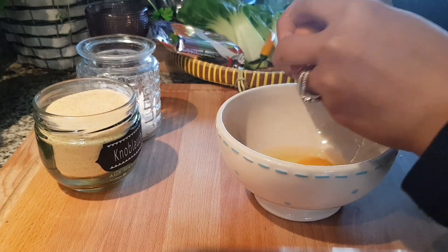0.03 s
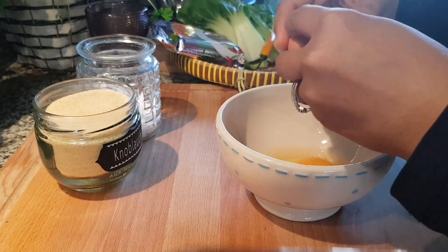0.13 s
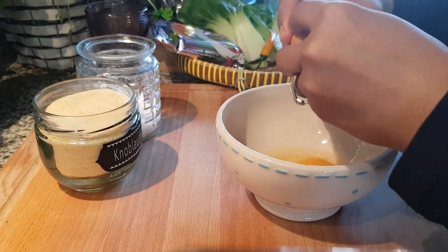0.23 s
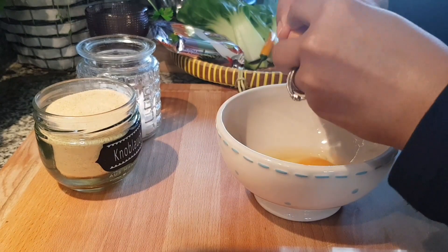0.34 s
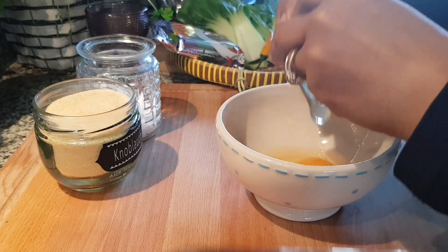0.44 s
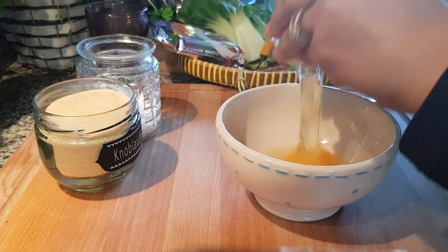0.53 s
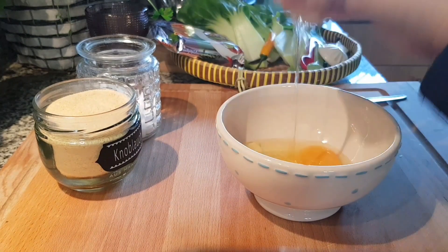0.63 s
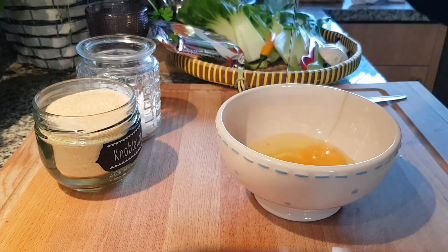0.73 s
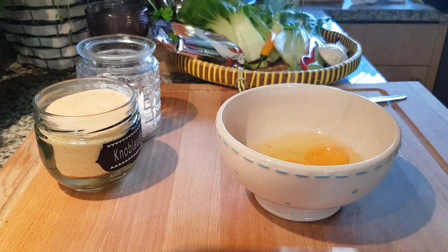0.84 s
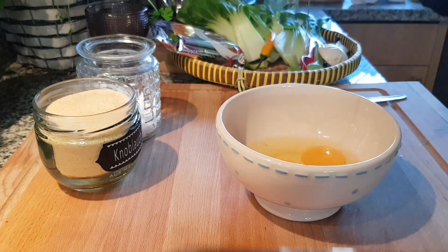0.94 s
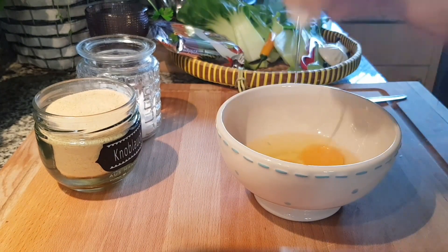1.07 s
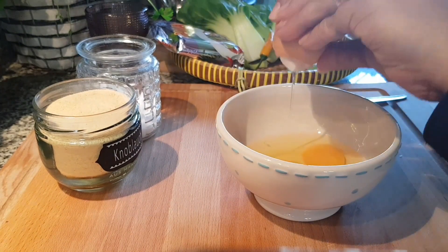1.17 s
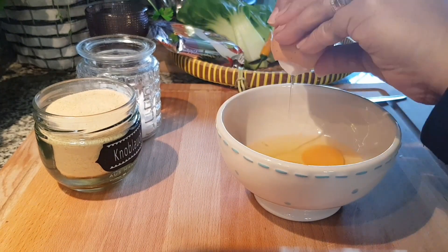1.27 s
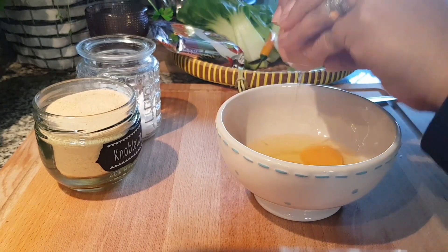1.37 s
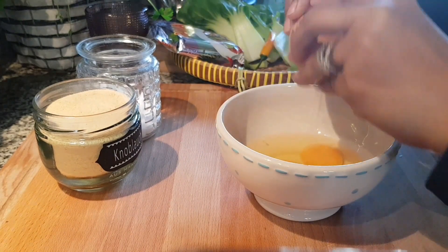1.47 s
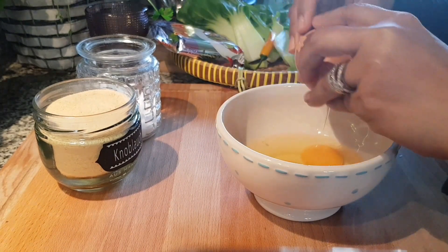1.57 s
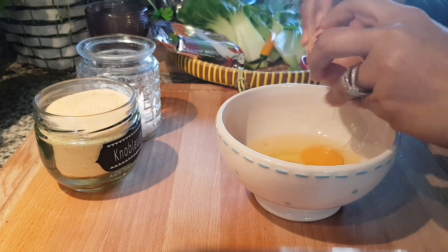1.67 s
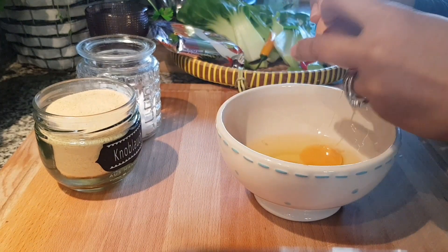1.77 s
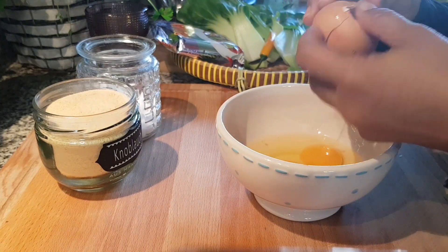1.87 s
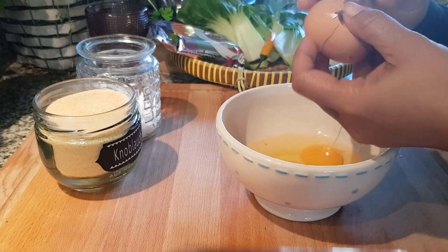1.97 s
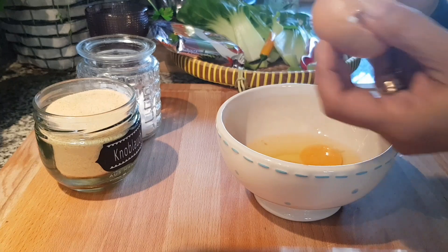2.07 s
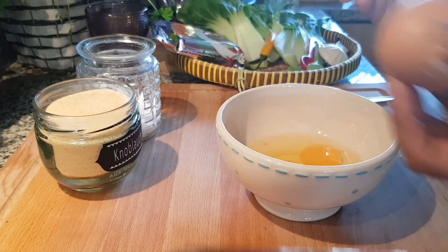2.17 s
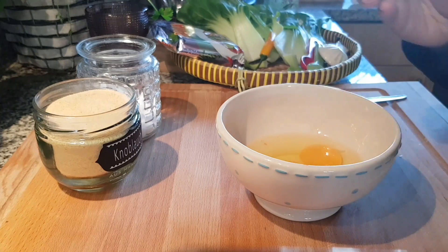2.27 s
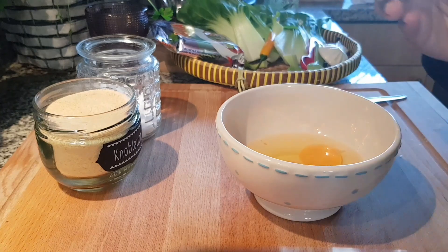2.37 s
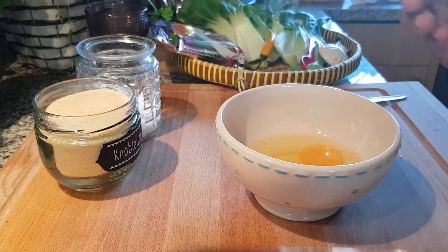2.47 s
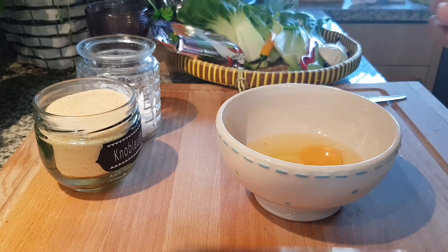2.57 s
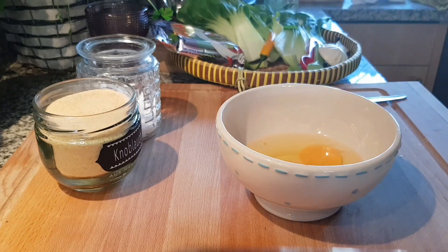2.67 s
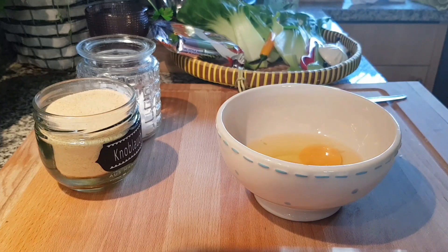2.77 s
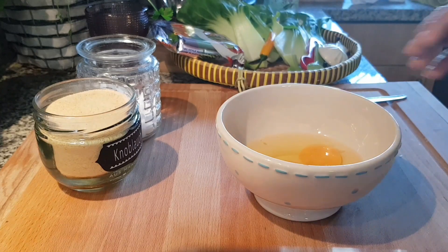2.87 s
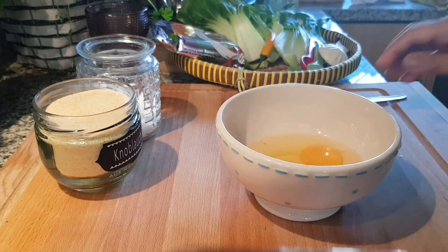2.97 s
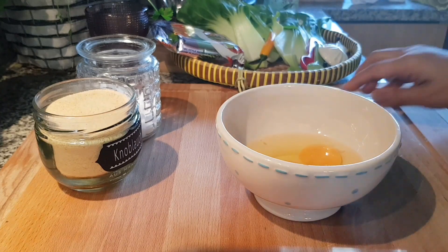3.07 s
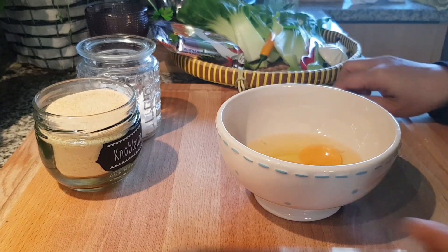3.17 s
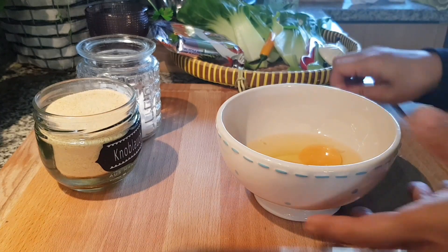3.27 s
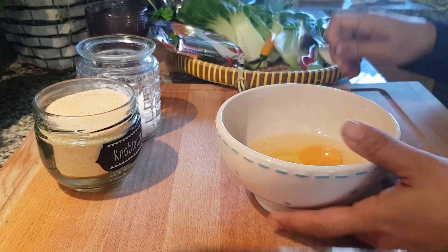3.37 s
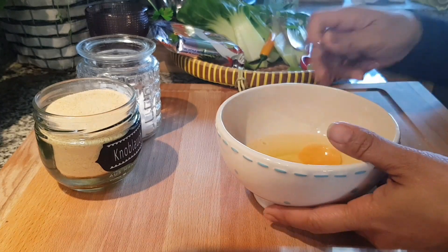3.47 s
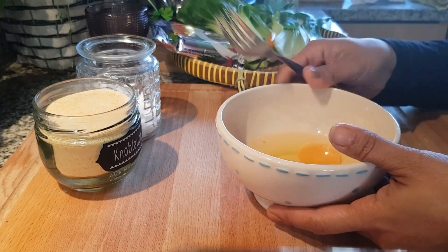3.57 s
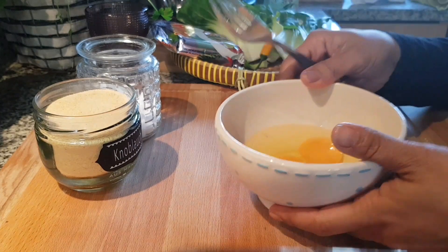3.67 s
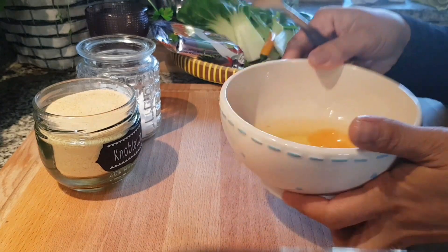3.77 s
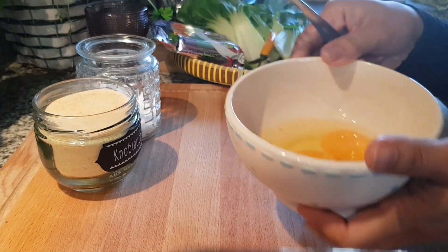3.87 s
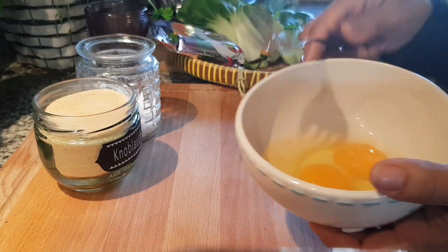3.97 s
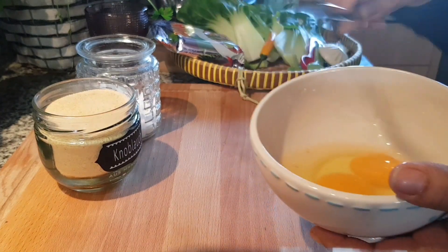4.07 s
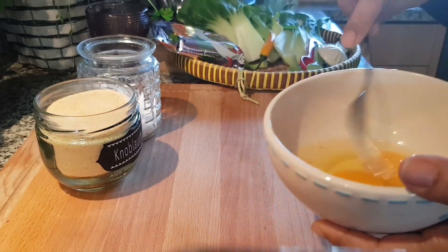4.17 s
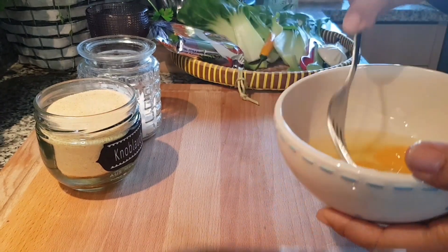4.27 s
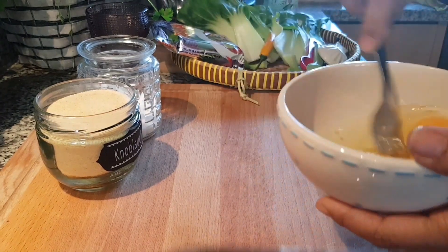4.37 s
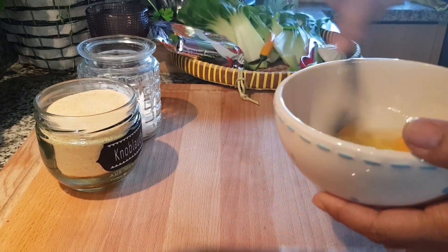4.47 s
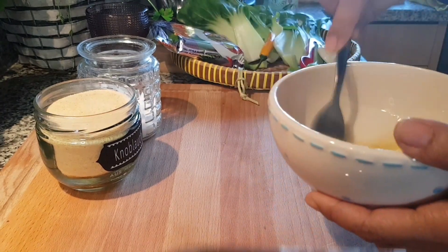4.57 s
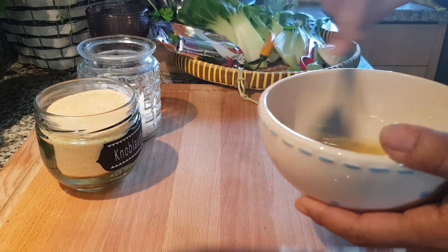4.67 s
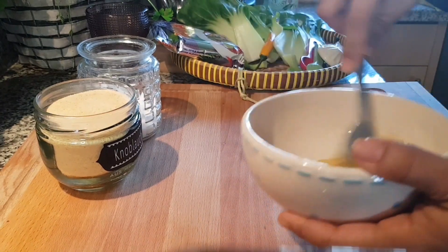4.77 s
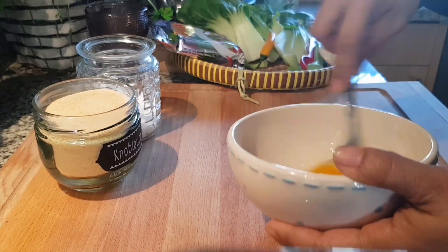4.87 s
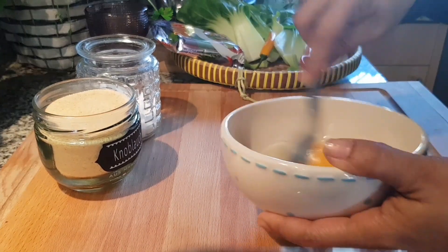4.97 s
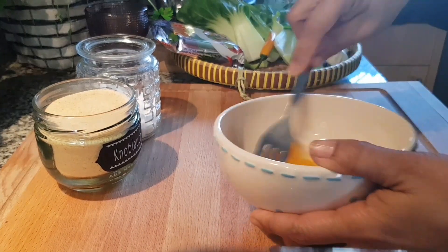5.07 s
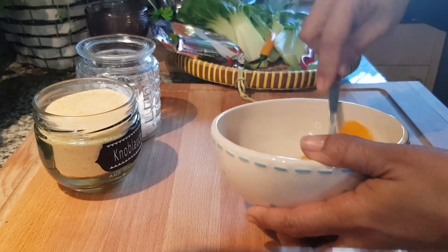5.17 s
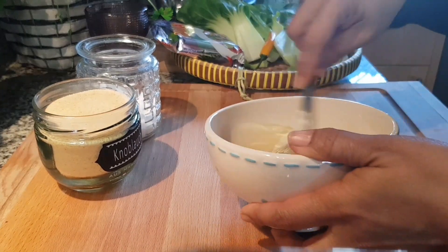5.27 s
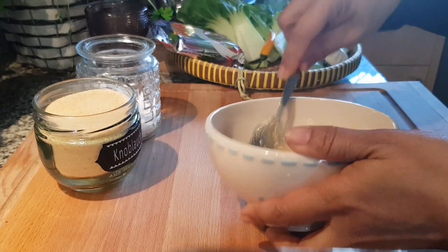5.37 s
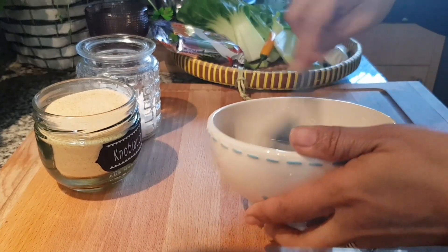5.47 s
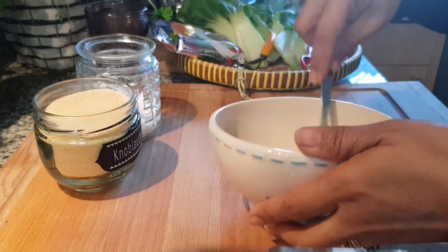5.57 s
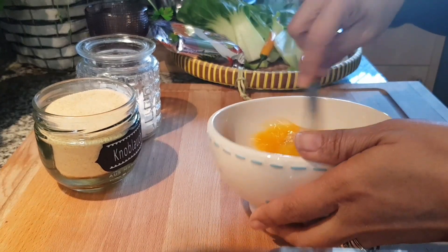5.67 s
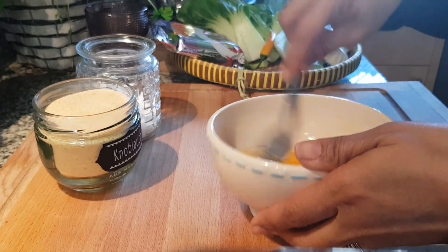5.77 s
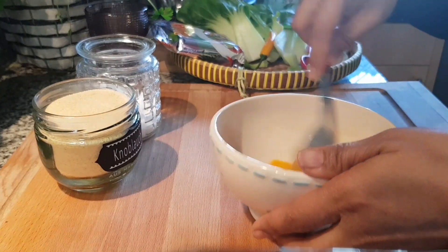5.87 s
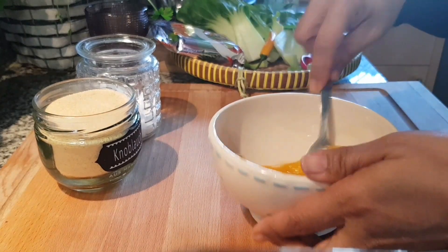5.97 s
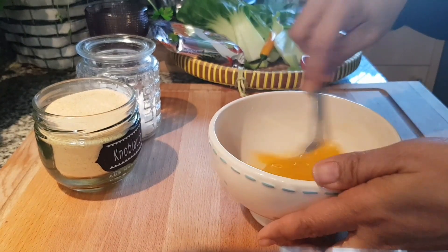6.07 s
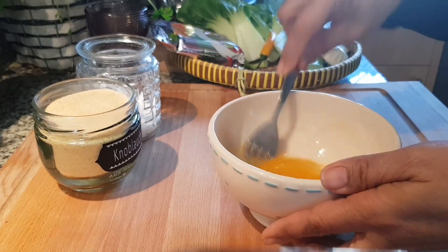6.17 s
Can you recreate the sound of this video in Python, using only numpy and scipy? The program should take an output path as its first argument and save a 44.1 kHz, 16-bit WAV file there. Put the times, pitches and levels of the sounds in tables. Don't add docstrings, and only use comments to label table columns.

```python
import sys
import numpy as np
from scipy import signal
from scipy.fft import rfft, irfft
from scipy.io import wavfile
from scipy.ndimage import uniform_filter1d

SR = 44100
rng = np.random.default_rng(int(sys.argv[2]) if len(sys.argv) > 2 else 0)


def undo_db(level):
    steps = np.asarray(level, float) / 20
    return 10 ** steps


def persist_wave(psi):
    counts = np.round(np.clip(psi, -1, 1) * 32767).astype(np.int16)
    wavfile.write(sys.argv[1], SR, np.atleast_2d(counts).T)


N = 273861
SPAN = 4096
SIDES = np.array([[1], [-1]])

# (frequency [Hz], level [dB], ring time [s])
BOWL = [(600, 32.5, 0.03), (790, 22, 0.09), (893, 27.5, 0.071), (1100, 2, .03), (1146, 3, 0.15),
        (1730, 8, 0.03), (2050, 20.5, 0.013), (2227, 16, 0.1), (2340, 15.5, 0.022), (2910, -47, .06),
        (3350, -71, 0.064), (4120, -18, 0.018), (4910, -13, 0.06), (5770, -41, 0.0083), (6000, -16, 0.032),
        (6555, 5, 0.016), (7220, -1, 0.02), (7920, -5.5, 0.014), (8400, -10, 0.028), (9870, -7, 0.0033),
        (11550, -2.5, 0.012), (13550, -6, 0.044)]
# (time [s], tines level [dB], wall level [dB], chatter [s])
HELD_BEATS = [(4.3723, -43, -75, 0.01), (4.3863, -19, -46, 0.012), (4.4640, -29, -56, 0.012),
              (4.498, -24.5, -46, 0.024), (4.5306, -30, -49, .012), (4.5406, -29, -53.5, 0.014),
              (4.6268, -39, -54, 0.0099), (4.6405, -18.5, -37.5, 0.0084), (4.710, -42, -42, 0.01),
              (4.7571, -28.5, -47, 0.0026), (4.7765, -18, -64, 0.013), (4.8700, -20, -38, 0.008),
              (4.8942, -8, -29, 0.01)]
# (time [s], tines level [dB], wall level [dB], belly level [dB], chatter [s])
LOW_BEATS = [(5.021, -27.5, -42, -46, 0.032), (5.1437, -24, -45, -53, 0.011), (5.183, -18, -32, -57, .0056),
             (5.281, -27.5, -43.5, -47, 0.017), (5.313, -26, -48, -38, 0.014),
             (5.3833, -28.5, -47, -71, .0086), (5.398, -25, -42, -64, 0.022),
             (5.4042, -23.5, -31, -43.5, 0.019), (5.459, -28.5, -44.5, -53, 0.013),
             (5.5312, -31, -38.5, -79, 0.012), (5.5556, -24, -36, -55, 0.016),
             (5.5787, -20.5, -36.5, -46.5, 0.025), (5.6675, -33.5, -46, -70, 0.011),
             (5.682, -30, -45, -53, 0.01), (5.7239, -30.5, -45, -39.5, 0.015),
             (5.7973, -28.5, -47, -78, .014), (5.8175, -28.5, -38.5, -53, 0.011),
             (5.843, -11, -32, -32.5, 0.011), (5.9314, -10.5, -21.5, -27.5, 0.014),
             (5.9823, -12, -28.5, -33, 0.011), (6.089, -21.5, -29.5, -55, .021),
             (6.125, -45, -42, -45, 0.0048)]
# (time [s], tines level [dB], wall level [dB], belly level [dB], chatter [s])
KNOCKS = [
    (5.0436, -22, -38, -36, 0.03),
    (5.0524, -46, -70, -20, 0.0082),
    (5.1590, -53, -70, -20, 0.011),
    (5.2384, -43, -46, -32.5, 0.018),
    (6.0527, -45, -66, -24.5, 0.013),
    (6.0655, -24, -35, -27, 0.02),
    (6.0746, -22.5, -28, -31, 0.016),
    (6.1053, -40, -35.5, -26, .011),
]
EDGE_PIVOT_DB = -30


def unit(x):
    return x / np.sqrt(np.mean(x ** 2, axis=-1, keepdims=True))


def design(lo_hz, hi_hz):
    return signal.butter(2, [lo_hz, min(hi_hz, .45 * SR)], "band", fs=SR, output="sos")


def band(x, lo_hz, hi_hz):
    return signal.sosfilt(design(lo_hz, hi_hz), x)


def fade(t, ring_s):
    return np.exp(-np.log(1000) * t / ring_s)


def walk(rate_hz):
    k = int(SR / rate_hz)
    steps = np.repeat(rng.standard_normal(N // k + 1), k)
    return 1.09 * uniform_filter1d(uniform_filter1d(steps, k), k)[:N]


def add(out, s, sound):
    i = int(s * SR)
    out[:, i:i + sound.shape[1]] += sound[:, :N - i]


def hush():
    # (frequency [Hz], level [dB per Hz])
    colour = [(15, -35), (25, -10), (50, 2), (70, -5.5), (102, 1), (190, -16), (217, -18.5), (384, -21),
              (775, -26), (911, -33), (1160, -60), (3160, -78.5), (4370, -65.5), (8360, -44.5),
              (16000, -32)]
    # (frequency [Hz], level [dB])
    fridge = [
        (47, -59.5),
        (100, -70),
    ]
    f = np.fft.rfftfreq(N, 1 / SR) + 1
    hz, db = np.transpose(colour)
    mid, side = rfft(rng.standard_normal((2, N))) * undo_db(np.interp(np.log(f), np.log(hz), db))
    side = side * np.clip(f / 1100, .2, .95)
    noise = irfft(mid + side * SIDES, N)
    noise = noise / np.std(noise) * undo_db(-56 + .6 * SIDES)
    hum = 0
    for tone_hz, tone_db in fridge:
        level = undo_db(tone_db + 1.0 * walk(11.0))
        turns = np.cumsum(tone_hz * (1 + 0.0223 * walk(5.6))) / SR
        hum = hum + level * np.sin(2 * np.pi * turns)
    return noise + hum


def kitchen(x):
    room_t60_s, room_db, room_gap_s = 0.19, -11, 0.0038
    t = np.arange(2 * SPAN) / SR
    tail = band(rng.standard_normal((2, len(t))), 233, 12000)
    tail = tail * (t > room_gap_s) * fade(t, room_t60_s)
    tail = tail / np.sqrt(np.sum(tail ** 2, axis=1, keepdims=True))
    return x + undo_db(room_db) * signal.fftconvolve(x, tail, axes=1)[:, :N]


def thuds():
    # (time [s], level [dB], length [s])
    pushes = [(2.79, -32, 0.2), (2.928, -36.5, 0.5), (3.051, -38, 0.5), (4.396, -40, 0.1),
              (5.055, -20, 0.053), (5.157, -17.5, 0.16), (5.233, -26.5, 0.16), (5.419, -31, 0.045),
              (5.936, -30, 0.3), (5.60, -34, .2), (6.058, -25.5, 0.036), (6.068, -21, 0.12),
              (6.104, -27, 0.23)]
    # (frequency [Hz], level [dB], ring time [s])
    wood = [
        (100, 9, 0.06),
        (136, 0, .05),
        (259, -.5, 0.08),
        (383, -6, 0.05),
        (530, -5, .04),
    ]
    out, t = np.zeros((2, N)), np.arange(2 * SPAN) / SR
    hz, db, ring = np.transpose(wood)[:, :, None]
    board = np.sum(undo_db(db) * np.sin(2 * np.pi * hz * t) * fade(t, ring), axis=0)
    for s, peak_db, length in pushes:
        push = rng.standard_normal(len(t)) * fade(t, max(length, .005))
        boom = signal.fftconvolve(push, board)[:len(t)]
        both = boom + .17 * SIDES * np.roll(boom, 40)
        add(out, s - .002, undo_db(peak_db + .5 * SIDES) * both / np.max(np.abs(boom)))
    return out


def gestures():
    # (start [s], hold [s], level [dB], brightness [dB])
    rubs = [(0.035, 0.14, -51.5, -17.5), (0.284, 0.034, -48.5, -3.5), (0.368, 0.11, -53.5, 0.5),
            (0.488, 0.17, -54.5, -23), (0.568, 0.02, -52.5, -6), (0.711, 0.025, -54.5, -4),
            (0.818, .02, -58.5, -3), (1.21, 0.17, -67, 0), (1.367, 0.028, -55.5, 0),
            (1.448, 0.067, -56.5, -5), (1.61, 0.12, -62.5, -7), (1.739, 0.088, -54.5, -6),
            (1.835, 0.2, -62, -2), (2.67, 0.07, -57.5, -8), (2.787, 0.0084, -48, -8.5),
            (2.857, 0.06, -56.5, -15), (2.954, 0.022, -51.5, -1.5), (3.02, 0.15, -54, -13),
            (3.254, 0.057, -46, -20.5), (3.335, 0.033, -56, -14.5), (3.414, .6, -73, 0.5),
            (4.436, 0.24, -68.5, 10), (5.588, 0.048, -50.5, -4.5), (6.043, 0.058, -45.5, -15)]
    rise_db_s, fall_db_s = 319, 254
    rest_db, rest_bright_db = -71.5, -7.5
    t = np.arange(0, N, 64) / SR
    s, hold, db, bright_db = np.transpose(rubs)[:, :, None]
    gain = undo_db(db - rise_db_s * np.maximum(s - t, 0) - fall_db_s * np.maximum(t - s - hold, 0))
    s, db = np.transpose([row[:2] for row in HELD_BEATS + LOW_BEATS + KNOCKS])[:, :, None]
    slosh_db = -57.5 + 0.33 * (db - EDGE_PIVOT_DB) - 125 * (t - s)
    slosh = (undo_db(slosh_db) * (t > s)).max(axis=0)
    dull = np.maximum(gain.max(axis=0), undo_db(rest_db)) + slosh
    bright = np.maximum((gain * undo_db(bright_db)).max(axis=0), undo_db(rest_db + rest_bright_db))
    return [np.interp(np.arange(N) / SR, t, g) for g in (dull, bright + slosh * undo_db(4))]


def pops():
    pops_per_s, low_hz, high_hz, cycles, spread_db = 260, 1097, 6980, 51, 20
    out, t = np.zeros((2, N)), np.arange(SPAN // 4) / SR
    for when, pitch, size, side in rng.random((pops_per_s * N // SR, 4)):
        hz = low_hz * (high_hz / low_hz) ** pitch
        tone = np.sin(2 * np.pi * hz * t + 2 * (side - .5) * SIDES) * fade(t, cycles / hz)
        add(out, when * N / SR, undo_db(spread_db * size) * tone * np.minimum(t * hz / 2, 1))
    return unit(out)


def rubbing():
    nested_s, lifted_s, fork_s = (1.3, 2.0), 3.41, 4.36
    dull, bright = gestures()
    t = np.arange(N) / SR
    grains = rng.standard_normal((2, N)) * undo_db(2.9 * walk(400) + 2.8 * walk(60))
    grains = grains[0] + 1.12 * SIDES * grains[1]
    cupped = np.where((t > nested_s[0]) & (t < nested_s[1]), .9, .2)
    hollow = unit(band(grains, 1450, 1900)) * undo_db(5.9 * walk(25.77)) * cupped
    hz, db, ring = np.transpose(BOWL)[:, :, None]
    glaze = np.sum(undo_db(db) * np.sin(2 * np.pi * hz * t[:SPAN]) * fade(t[:SPAN], 2 * ring), axis=0)
    rung = signal.fftconvolve(grains * undo_db(10.0 * walk(23)), glaze[None], axes=1)[:, :N] * (t > lifted_s)
    low = unit(band(band(grains, 570, 1810), 480, 2800)) + hollow + 0.49 * unit(band(rung, 650, 2200))
    shell_hiss = unit(band(band(grains, 3940, 6830), 1670, 9800))
    fork_hiss = unit(band(band(grains, 5200, 8600), 3000, 9800)) + .45 * unit(band(grains, 2500, 5000))
    high = np.where(t > fork_s, fork_hiss, shell_hiss) + 0.13 * unit(band(rung, 2230, 5500))
    top = unit(band(grains, 10300, 14000)) * undo_db(-3)
    bubbles = pops() * undo_db(-3) * np.sqrt(dull * bright)
    return bubbles + low * dull * undo_db(-4.5) + bright * (high + top)


def contact(s, high_db, mid_db, low_db, chatter, edge_db):
    return s, high_db, low_db, mid_db, edge_db + 0.56 * (high_db - EDGE_PIVOT_DB), chatter


def blows(table, modes, cracks_hz, crack_db, rough_db, trim_db):
    widths = (.7, .55, .9, 1.1)
    out, t = np.zeros((2, N)), np.arange(SPAN) / SR
    hz, db, ring = np.transpose(modes)[:, :, None]
    zone = np.searchsorted([lo for lo, hi in cracks_hz[1:]], 1.2 * hz[:, 0])
    sections = [np.vstack([design(lo, hi), design(.7 * lo, 1.6 * hi)]) for lo, hi in cracks_hz]
    fades = fade(t, ring)
    head = int(.012 * SR)
    for s, high_db, low_db, mid_db, edge_db, chatter in table:
        spot = rng.standard_normal((2, len(hz), 1))
        ears = rng.standard_normal((2, 2, len(hz), 1))
        push = rng.standard_normal((3, SPAN))
        contacts = push[0] * undo_db(rough_db * np.repeat(push[1, :SPAN // 32], 32))
        rise = np.minimum(t / (.3 * chatter), 1)
        contacts = contacts * rise * fade(t, max(3 * chatter, .003))
        phase = np.clip(hz / 5000, .45, 1.2) * ears[1]
        tones = np.sin(2 * np.pi * hz * (1 + 0.0295 * spot[1]) * t + phase) * fades
        tones = tones * undo_db(db + 2.5 * spot[0] + 2.5 * ears[0]) / np.sqrt(ring * SR)
        sound = 0
        for k, level_db in enumerate([low_db, mid_db, high_db + trim_db, edge_db]):
            body = tones[:, zone == k].sum(axis=1)
            rung = signal.fftconvolve(body, contacts[None], axes=1)[:, :SPAN]
            uneven = widths[k] * SIDES * push[2] * np.abs(contacts)
            crack = signal.sosfilt(sections[k], contacts + uneven)
            part = unit(rung) + undo_db(crack_db - 0.78 * (k == 0)) * unit(crack)
            sound = sound + undo_db(level_db) * part / np.sqrt(np.mean(part[:, :head] ** 2))
        add(out, s - .002, sound)
    return out


def eggshell():
    # (frequency [Hz], level [dB], ring time [s])
    shell_tones = [(398, 2, 0.11), (575, 9, 0.025), (970, 1, 0.014), (1340, -32, 0.022), (1700, 20, 0.03),
                   (2234, 7, 0.12), (2760, -15, .015), (3480, 25, 0.012), (4560, -11, 0.067),
                   (5900, -12, 0.012), (6000, -12, 0.018), (9600, -23, 0.00088), (11300, -18, 0.0025)]
    # (time [s], snap level
    # [dB], cup level [dB], chatter [s])
    cracks = [(0.0133, -52, -45.5, 0.021), (0.2857, -37.5, -49.5, 0.018), (0.3536, -41.5, -53.5, 0.042),
              (0.391, -31, -63, 0.025), (.4188, -33.5, -45, 0.017), (0.474, -54, -48, 0.0099),
              (0.515, -43.5, -56, 0.024), (0.5794, -47.5, -55, 0.045), (.727, -36, -43.5, 0.0049),
              (0.8095, -44, -72, .016), (1.2156, -48, -65, 0.017), (1.3018, -44.5, -64.5, 0.034),
              (1.361, -46.5, -54, 0.01), (1.4714, -42, -42, 0.0059), (1.481, -45.5, -47, 0.016),
              (1.5495, -46, -40, 0.0095), (1.624, -51, -74, 0.015), (1.7618, -47.5, -53, 0.021),
              (1.8447, -38, -67, 0.025), (1.873, -35.5, -67, 0.01), (2.0155, -47.5, -71, 0.011),
              (2.595, -55.5, -67.5, 0.0099),
              (1.139, -65, -80, .004),
        (1.157, -67, -75, .004),
        (1.180, -59, -80, .005),
        (1.318, -54, -70, .005),
        (1.7336, -52, -58, .008),
        (0.312, -51, -58, .01),
        (0.445, -48, -52, .008),
        (3.047, -56, -60, .008),
    ]
    # (time [s], snap level [dB], cup level [dB], wood level [dB], chatter [s])
    taps = [
        (0.736, -38.5, -41.5, -46.5, 0.012),
        (2.6682, -54, -84, -57, 0.019),
        (2.7991, -44, -39.5, -51.5, 0.016),
        (2.818, -66, -46, -48.5, 0.016),
        (2.9115, -46.5, -57.5, -59, .0092),
        (3.131, -52, -54, -78, .014),
        (3.177, -52.5, -76, -44, 0.015),
        (3.242, -64, -42.5, -56, 0.0077),
        (3.2703, -75, -78, -42.5, 0.036),
        (3.3246, -75, -48, -56, 0.036),
    ]
    fingers_db = -20
    contacts = [contact(s, h, m, m + fingers_db, c, -45.5) for s, h, m, c in cracks]
    contacts = contacts + [contact(*row, -50.5) for row in taps]
    return blows(contacts, shell_tones, [(350, 1500), (1400, 2360), (3300, 6050), (8500, 14000)],
                 crack_db=7, rough_db=1.5, trim_db=-8.5)


def pings(rings, touched):
    out, t = np.zeros((2, N)), np.arange(2 * SPAN) / SR
    for s, db, hz, ring in rings:
        flutter = 10 * uniform_filter1d(rng.standard_normal((3, len(t))), 100)
        flutter = flutter * (1 if touched else .3)
        shape = np.minimum(t / 0.0014, 1) * fade(t, ring) * (1 + 0.34 * flutter[0])
        glide = .06 * (hz < 1000 and touched)
        turns = hz * (t - glide * .025 * (1 - np.exp(-t / .025)))
        phase = 0.42 * SIDES + 0.76 * np.exp(-t / 0.082) * flutter[1:]
        add(out, s, undo_db(db) * shape * np.sin(2 * np.pi * turns + phase))
    return out


def ringing():
    # (time [s], level [dB], frequency [Hz], ring [s])
    handling = [(1.400, -38, 1845, .088), (1.475, -30, 1662, 0.09), (1.624, -38, 1700, 0.063),
                (2.799, -26, 1166, 0.022), (2.911, -43, 4740, .024), (3.425, -64, 6130, 0.2),
                (3.428, -57, 4075, 0.2), (3.470, -59.5, 2290, 0.16), (3.614, -57.5, 6100, 0.19),
                (3.242, -34, 1580, .03), (3.72, -62, 5500, .1), (3.80, -63, 5900, .1),
                (3.89, -61, 5300, .08), (3.97, -63, 5600, .1), (1.68, -50, 1720, .15),
                (1.80, -50, 1800, .15), (1.93, -52, 1700, .15), (1.425, -44, 1850, .05)]
    # (time [s], level [dB], frequency
    # [Hz], ring [s])
    beat_rings = [(4.392, -32.5, 7530, 0.16), (4.389, -23, 4050, 0.05), (4.466, -30.5, 9550, 0.16),
                  (4.535, -30, 7910, 0.12), (4.535, -41, 3060, 0.15), (4.643, -13.5, 5160, 0.027),
                  (4.641, -16.5, 7920, 0.037), (4.777, -11, 7220, 0.027), (4.776, -16.5, 5950, 0.029),
                  (4.777, -11, 8030, 0.023), (4.900, -26, 6750, 0.16), (5.182, -8, 6750, 0.013),
                  (5.317, -22.5, 4950, 0.028), (5.406, -27.5, 4075, .15), (5.579, -16.5, 6000, .026),
                  (5.727, -29, 7630, 0.031), (5.842, -7.5, 6730, 0.021), (5.932, -16.5, 4255, 0.061),
                  (5.931, -8.5, 6150, 0.021), (5.984, -10.5, 6680, 0.021), (6.077, -25.5, 6060, 0.06),
                  (5.582, -24, 7950, .04), (4.870, -23, 6060, .02), (4.896, -16, 8200, .03),
                  (4.535, -42, 6080, .12), (5.932, -16, 2600, .02), (5.585, -30, 6550, .12),
                  (4.500, -32, 2250, .06), (4.464, -34, 3300, .015), (5.405, -30, 6100, .05),
                  (4.580, -39.5, 1140, 0.08), (4.711, -26.5, 1745, 0.037), (4.777, -20.5, 1997, 0.037),
            (4.78, -21, 1270, 0.033), (4.902, -17, 1580, 0.06), (4.894, -17, 2040, .035),
            (4.996, -29.5, 2075, 0.06), (5.056, -15, 800, 0.09), (5.162, -14, 790, 0.086),
            (5.319, -27.5, 1267, 0.043), (5.382, -19.5, 2425, .03), (5.461, -34, 1228, 0.095),
            (5.503, -29, 1272, .077), (5.640, -29, 2080, 0.023), (5.818, -26.5, 2050, 0.019),
            (6.064, -17, 810, 0.12), (6.115, -25, 820, 0.1), (6.056, -24, 925, .08), (6.058, -29, 262, .12),
            (5.16, -30, 255, .12), (5.158, -19, 560, .04), (5.158, -22, 960, .04), (6.066, -28, 650, .12),
            (5.054, -22, 1130, .03), (5.532, -30, 2570, .025)]
    # (time
    # [s], level [dB], frequency [Hz], ring [s])
    free = [(6.126, -37, 2290, .5), (6.129, -51, 4075, .35), (6.16, -59, 6130, .3), (5.935, -32, 2300, .15),
            (5.402, -30, 2380, .12), (4.78, -36, 1450, .15), (4.645, -44, 930, .15), (4.51, -48, 925, .3),
            (.07, -54, 1140, .3), (.10, -54, 860, .25), (4.415, -40, 3800, .12), (4.50, -38, 2350, .1)]
    return pings(handling + beat_rings, True) + pings(free, False)


def fork_beats():
    # (time [s], tines level [dB], wall level [dB], belly level [dB], chatter [s])
    bounces = [(4.410, -32, -60, -75, .006), (4.7360, -36, -55, -75, .008), (4.9035, -27, -35, -60, .006),
               (4.9959, -36, -60, -75, .012), (5.5007, -42, -50, -60, .006), (5.596, -27, -42, -60, .008),
               (5.945, -24, -34, -45, .012), (5.966, -34, -42, -60, .01), (5.060, -40, -50, -30, .012),
               (5.168, -55, -60, -31, .008), (6.132, -40, -50, -37, .012), (5.322, -30, -48, -45, .006)]
    palm_db, low_edge_db = -27, -37
    beats = [contact(s, h, m, m + palm_db, c, -35.5) for s, h, m, c in HELD_BEATS]
    beats = beats + [contact(*row, low_edge_db) for row in LOW_BEATS]
    beats = beats + [contact(*row, -39.5) for row in KNOCKS]
    beats = beats + [contact(*row, low_edge_db) for row in bounces]
    return blows(beats, BOWL, [(520, 1100), (1500, 2840), (4300, 8400), (9500, 15700)],
                 crack_db=2.5, rough_db=4, trim_db=-12.0)


def scene():
    lowered_s, air_hz, board_hz = 5.01, 520, 200
    bowl = fork_beats() + ringing()
    in_air = np.arange(N) < lowered_s * SR
    bowl = np.where(in_air, band(bowl, air_hz, SR), band(bowl, board_hz, SR))
    near = kitchen(bowl + eggshell() + rubbing())
    near = near + .15 * SIDES * band(near, 6800, 13400)
    return near + band(thuds(), 146, 930) + hush()


def band_limit(x):
    return signal.sosfilt(signal.butter(12, 16800, fs=SR, output="sos"), x)


def record(dry):
    cut = signal.sosfilt(signal.ellip(6, .3, 30, 15750, fs=SR, output="sos"), dry)
    return band_limit(cut)


dry = scene()
out = record(dry)
persist_wave(out)
```